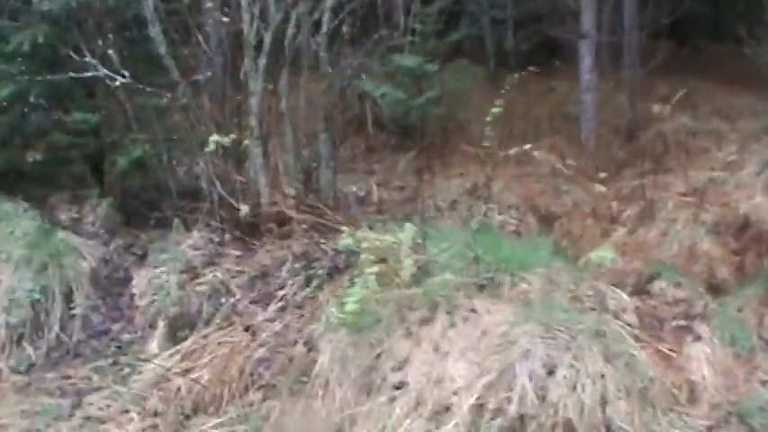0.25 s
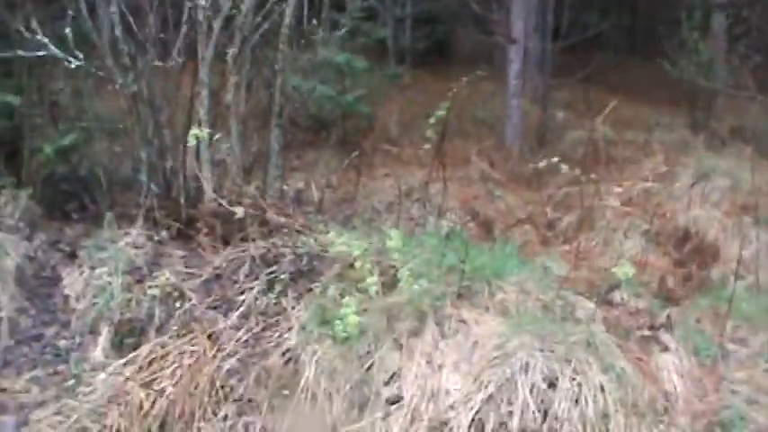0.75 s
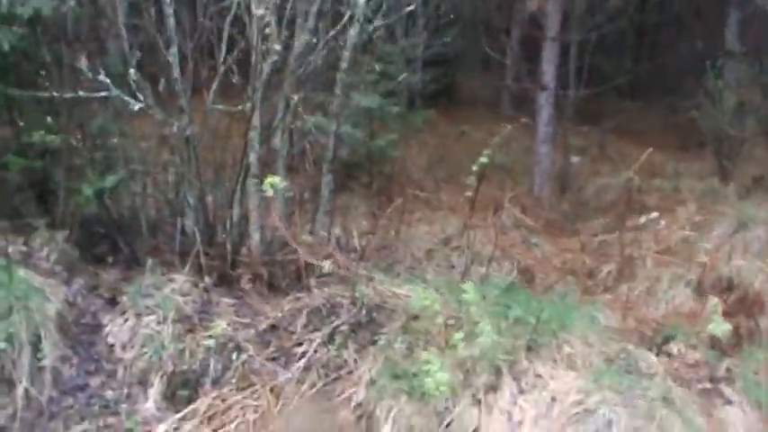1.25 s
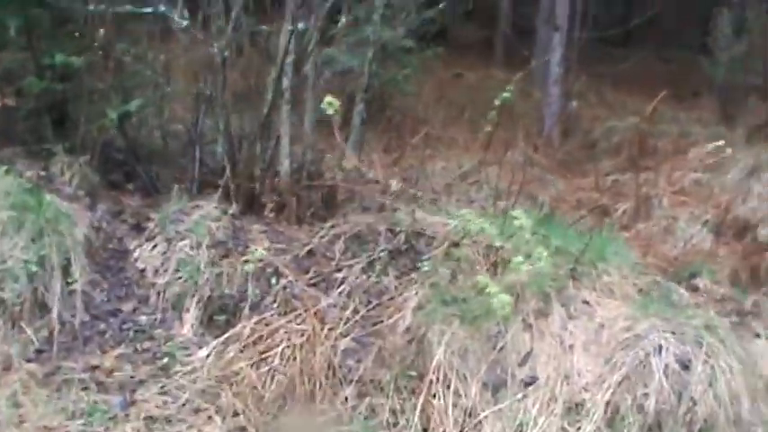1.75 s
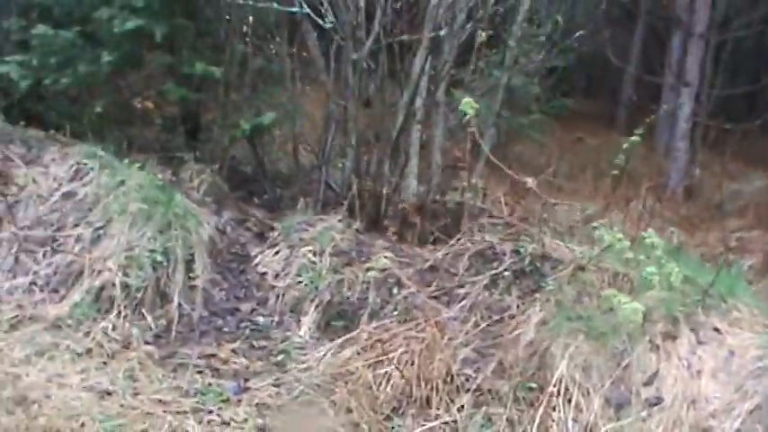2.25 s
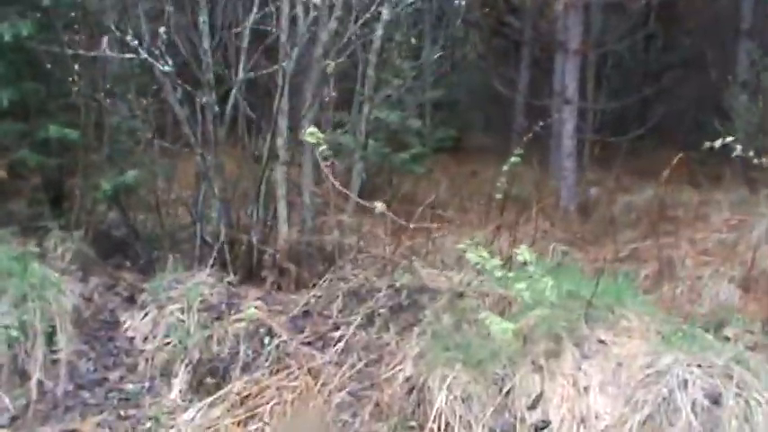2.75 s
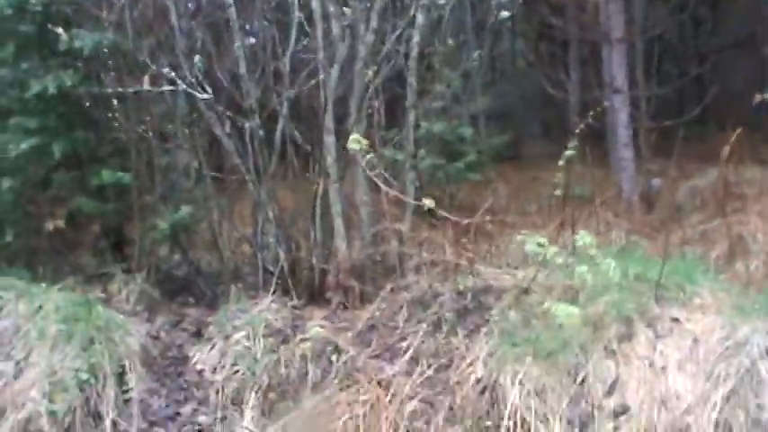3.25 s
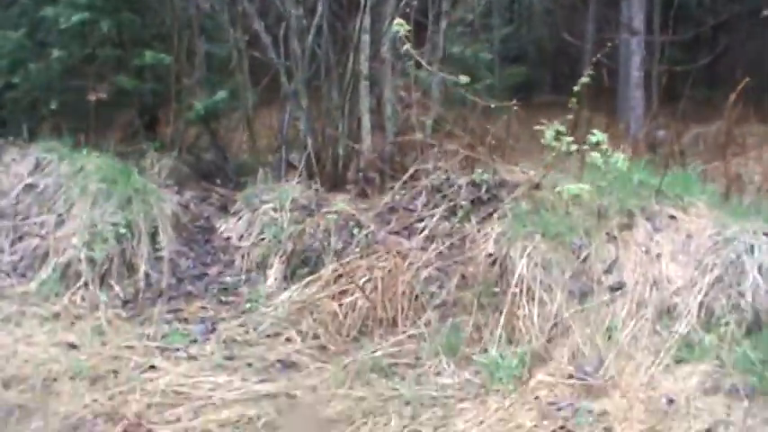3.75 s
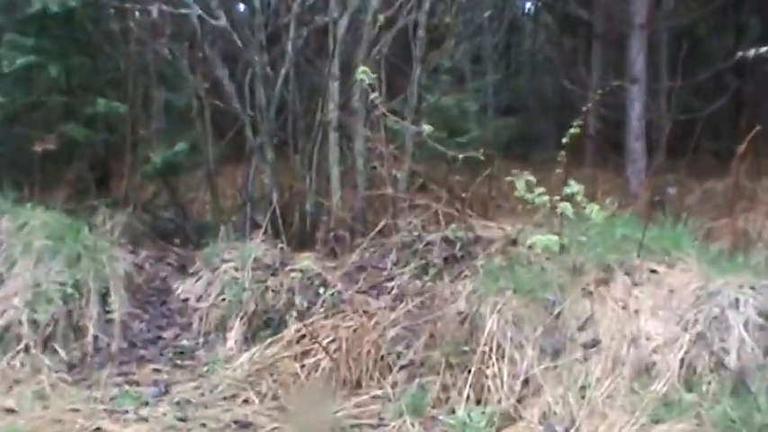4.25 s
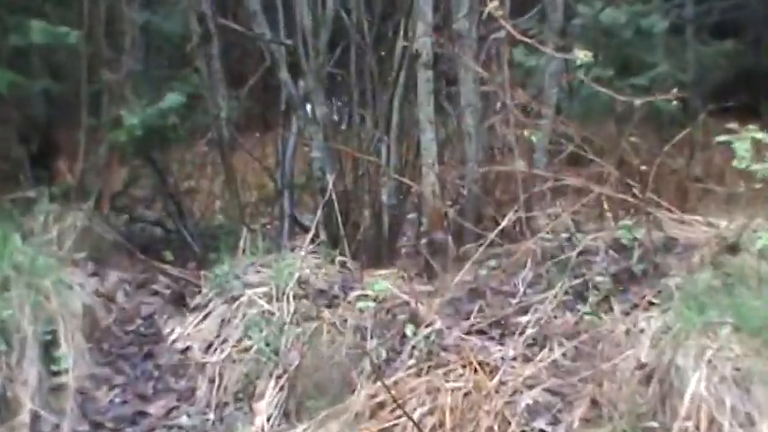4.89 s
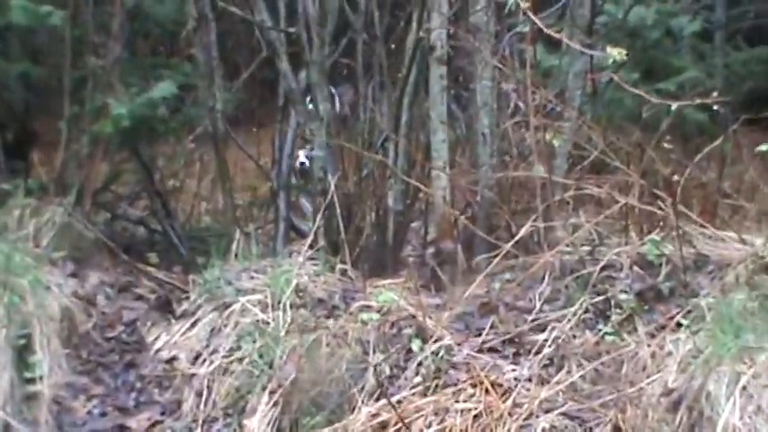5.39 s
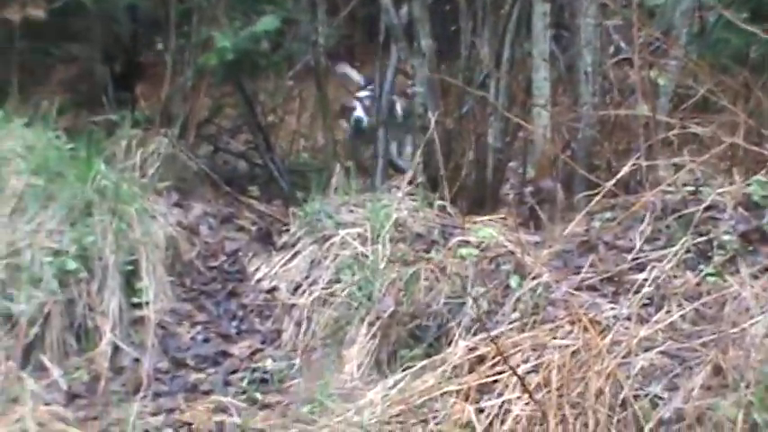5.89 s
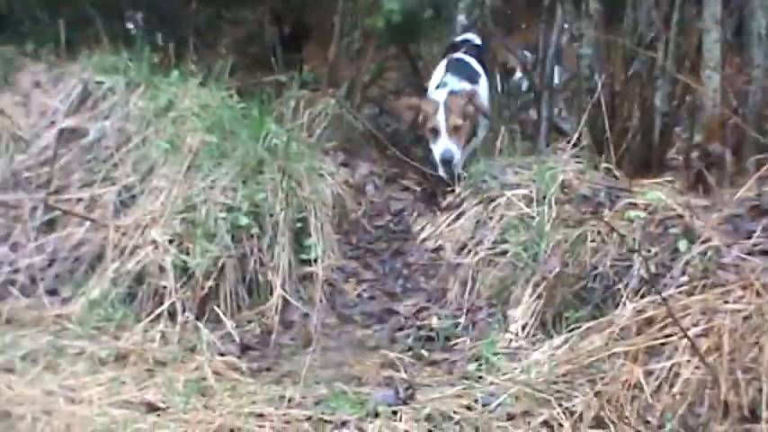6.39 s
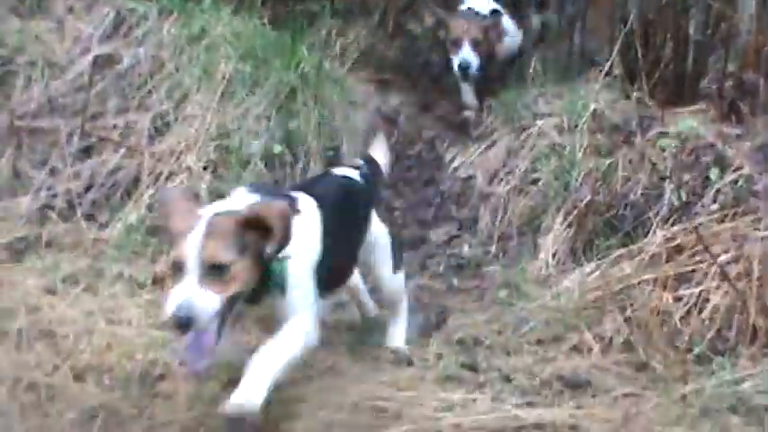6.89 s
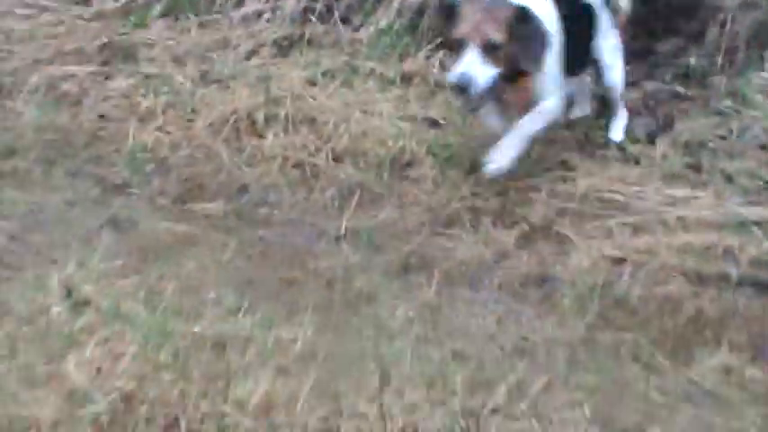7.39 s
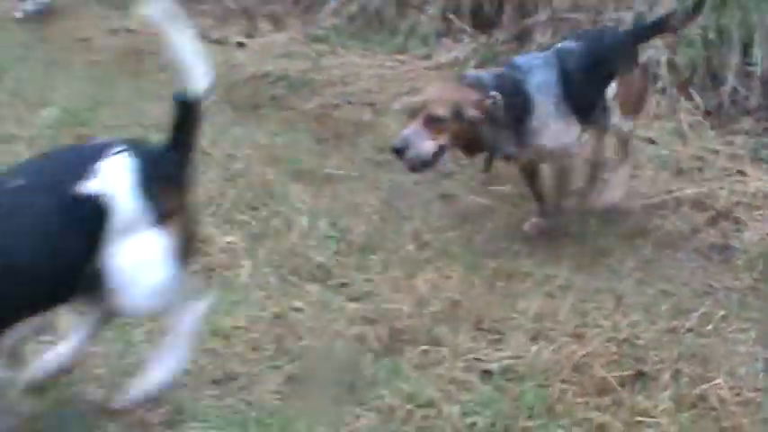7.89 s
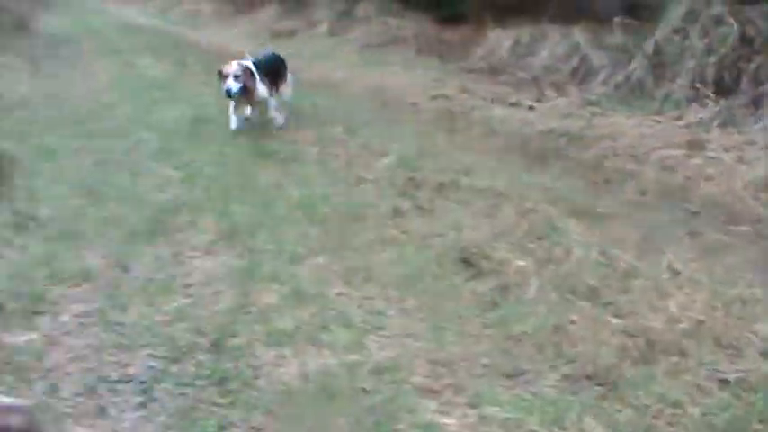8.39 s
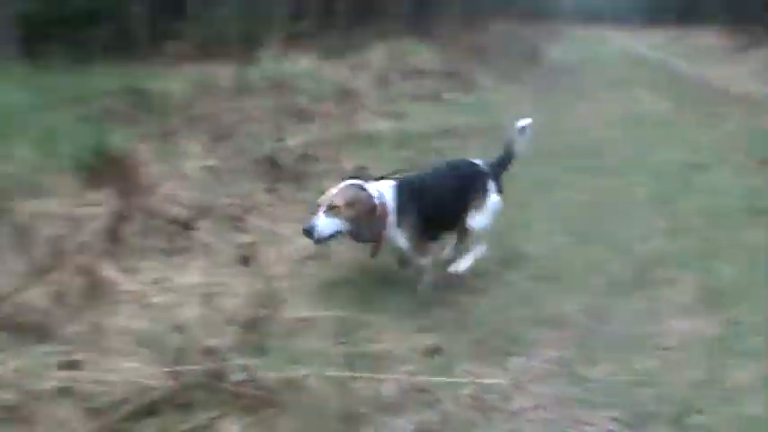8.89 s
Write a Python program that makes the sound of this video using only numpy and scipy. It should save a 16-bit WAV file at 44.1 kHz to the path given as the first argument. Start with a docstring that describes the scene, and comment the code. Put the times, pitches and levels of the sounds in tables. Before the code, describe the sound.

Baying hounds run up a woodland trail, short howls and rough barks ringing off trees, then twigs, paws, grass and panting close by.

```python
"""A clear howl and a harsh bark sound together at once, over rustling leaves and wind; the trees echo them.
A pack of hounds bays in a wood, runs up a trail and passes a hand-held camera.
Howls are sums of gliding overtones; barks are uneven pulses ringing through chest and mouth, with hiss.
Twigs snap as fading noise, noses whistle and paws thump as short tones. Later, brushed grass and pants
come close as swells of noise. Wind brushes the two microphone ports as low noise."""
import sys
import numpy as np
from scipy import signal
from scipy.fft import rfft, irfft, next_fast_len
from scipy.io import wavfile
from scipy.ndimage import uniform_filter1d, minimum_filter1d, map_coordinates

SR = 44100
rng = np.random.default_rng(int(sys.argv[2]) if len(sys.argv) > 2 else 0)


def to_wav(s):
    """Save 16-bit WAV."""
    ch = np.atleast_2d(s).T  # columns
    pcm = np.round(np.clip(ch, -1, 1) * 32767)  # PCM
    wavfile.write(sys.argv[1], SR, pcm.astype(np.int16))


N = 402985
T = np.arange(N) / SR  # the time of each sample, in seconds


def amp(db):
    """Turn a level in dB into a gain."""
    return 10 ** (np.asarray(db) / 20)


def unit(x):
    """Scale a signal to an rms of 1."""
    return x / np.sqrt(np.mean(x ** 2) + 1e-20)


def along(points, hz):
    """Read a value between (Hz, value) points, on a log frequency axis."""
    f, v = np.transpose(points)
    return np.interp(np.log(hz + 1), np.log(f + 1), v)


def curves(rows, t):
    """Read each column after the first at the times t."""
    s, *cols = np.transpose(rows)
    return [np.interp(t, s, c) for c in cols]


def wobble(rate):
    """Draw a smooth random curve with this many knots a second."""
    return map_coordinates(rng.standard_normal(int(N * rate / SR) + 4), [T * rate])


def filtered(x, response):
    """Multiply the spectrum of x by a complex response."""
    m = next_fast_len(N + 8192)
    return irfft(rfft(x, m) * response(np.fft.rfftfreq(m, 1 / SR)), m)[..., :N]


def coloured(x, spectrum):
    """Shape x with (Hz, dB) points, then scale it to an rms of 1."""
    return unit(filtered(x, lambda hz: amp(along(spectrum, hz))))


def span(s, length, rise, fall):
    """Give the samples of a call, its progress from 0 to 1 and its soft edges."""
    part = slice(round(s * SR), min(N, round((s + length) * SR)))
    t = T[part] - s
    edge = np.clip(np.minimum(t / rise, (length - t) / fall), 0, 1) ** 1.2
    return part, t / length, edge


def resonate(x, centre_hz, width_hz, lift_db, patchy_db):
    """Pass x through a moving throat resonance, with patches of chance where the throat's shape shifts."""
    hz, t, z = signal.stft(x, SR, nperseg=512)
    centre = np.interp(t, T, centre_hz)
    hump = 1 / (1 + ((hz[:, None] - centre) / width_hz * 2) ** 2)
    above = 1 / (1 + (0.54 * centre / (hz[:, None] + 1)) ** 6)  # little sounds far below the resonance
    field = rng.standard_normal(z.shape)
    field = uniform_filter1d(uniform_filter1d(field, size=4, axis=0), size=5, axis=1)
    shaped = z * above * amp(lift_db * hump + patchy_db * unit(field))
    return unit(signal.istft(shaped, SR, nperseg=512)[1][:N])


def puffs(table):
    """Make short swells of noise, each in one wide resonance."""
    out = np.zeros(N + SR)
    for s, length, hz, width_hz, db in table:
        u = np.arange(round(length * SR)) / (length * SR)
        f = np.fft.rfftfreq(len(u), 1 / SR)
        band = 1 / (1 + np.abs((f - hz) / width_hz * 2) ** 2.1)
        puff = irfft(rfft(rng.standard_normal(len(u))) * band, len(u))
        swell = np.sin(np.pi * u ** 0.73)  # loudest before the middle
        out[round(s * SR):][:len(u)] += amp(db) * swell * unit(puff)
    return out[:N]


# Throat colour of a howl's overtones: pitch_hz, level_db
THROAT_COLOUR = [(2000, -2), (3300, -12), (3800, -26.5), (4500, -19.5), (5500, -36), (7500, -27),
                 (10000, -33), (12000, -45)]
# Clear howls, two rows at once where a voice carries an undertone: start_s, length_s, turn (share of length),
# start_hz, turn_hz, end_hz, level_db (at the turn), onset_db and fade_db (how far below that it starts and ends),
# overtone_db (above the fundamental, before throat and mouth), mouth_hz, roughness (0-1)
HOWL_CALLS = [ (0.0, 0.27, .55, 955, 1202, 1197, -28.5, 9, 16.5, -3.5, 2310, 1),
              (0.615, 0.16, 0.54, 805.5, 634, 601, -24.5, 4, 8.5, -9.5, 2330, 0.27),
              (0.97, 0.15, 0.47, 510.3, 607, 582, -32.5, 15, 8, -2.5, 1800, 0.77),
              (1.326, 0.15, 0.46, 582, 603.5, 592.5, -28, 9, 23, -12, 1780, 0.74),
              (1.725, 0.055, 0.66, 942, 1116, 1071, -18.5, 13, 15, -18.5, 2178, 0.45),
              (2.19, 0.054, 0.48, 997, 1087, 1029, -26.5, -2, 4, -13, 2050, 0.62),
              (2.251, .17, 0.52, 1033, 671, 655, -21.5, 1, 22, -13, 2060, 0.53),
              (2.6, 0.13, 0.45, 641.5, 662, 658.3, -23.5, 12, 9.5, -20, 1948, .6),
              (2.87, 0.073, 0.18, 894, 908.5, 760, -21, 24, -8, -16.5, 2607, 0.39),
              (2.975, 0.11, 0.41, 650.7, 687, 677, -14.5, 5, 14, -18, 2120, 0.47),
              (3.15, 0.24, .3, 1101, 1320, 1284, -23, 7.5, 14.5, -3, 2593, 0.61),
              (3.655, 0.23, 0.61, 837, 647, 663.8, -17, 3, 19, -14.5, 2093, .3),
              (3.87, 0.047, 0.48, 992, 1007, 1103, -30, 8, -7, -10, 2087, 0.42),
              (3.915, 0.16, .3, 1148, 1262, 1292, -19.5, 2.5, 10.5, 0.5, 2570, 0.35),
              (4.385, 0.26, 0.56, 893, 644, 748, -21.5, 3, 3.5, -10.5, 2470, 0.39),
              (4.632, 0.17, 0.74, 1126, 1245, 1035, -27.5, -3.5, 1, -9, 2460, 0.5),
              (4.989, 0.039, 0.86, 945, 1155, 1203, -12, 4, 10, -8.5, 2208, 0.62),
              (5.128, .11, .4, 690.2, 640.5, 618, -21, -1, 6.5, -16.5, 1602, 0.37),
              (5.312, 0.049, 0.69, 903, 1104, 1160, -23, 2, 14, -32, 2100, .6),
              (5.56, .185, 0.36, 749, 644, 770, -15, 7, 4, -14, 2054, 0.29),
              (5.74, 0.19, 0.22, 1147, 1203, 786.3, -18, 0.5, 1.5, -14.5, 2357, 0.45),
              (6.101, 0.05, 0.51, 697, 707, 686.6, -22.5, 12, 4, -9.5, 1400, 0.47),
              (6.149, .12, 0.46, 649, 617, 563, -19.5, 4.5, 7.5, -8, 1250, 0.61),
              (6.258, 0.099, 0.52, 1010, 1059, 813, -32.5, -2, -5, -7.5, 2107, 0.63),
              (6.589, 0.1052, 0.502, 1226, 1316, 1305, -13.5, 14.5, 23, -4.5, 2620, 0.27),
              (6.656, 0.073, 0.23, 646.5, 650.5, 702, -26.5, 6, 0.5, 0, 2157, .8),
              (6.724, 0.055, .4, 750, 791, 728.3, -18.5, 10, -10, -7.5, 2264, 0.48),
              (6.79, 0.12, 0.22, 711, 692, 564.3, -11.5, 3, 10, -13.5, 1940, 0.45),
              (6.929, 0.087, 0.11, 1044, 1010, 813, -26, -4, 5.5, -8, 2060, 0.65),
              (7.219, 0.023, 0.24, 400.7, 431.4, 520, -21.5, 8, -4, -33, 1800, 0.43),
              (7.238, 0.039, 0.49, 741, 797, 770, -25, 0, 27, 8.5, 2335, 0.32),
              (7.483, 0.07, 0.47, 822, 777, 742, -8.5, 6, 3, -11.5, 3650, 0.73),
              (7.548, 0.034, .3, 686, 704, 735, -14, 0, -5, -14, 2100, 0.28),
              (7.547, 0.039, .3, 1382, 1414, 1424, -5, -1, 6, 4.5, 3844, 0.51),
              (7.955, 0.052, 0.64, 872, 1134, 1006, -21, 1, 24, -19.5, 1900, 0.55),
              (8.129, 0.068, 0.083, 835, 844.4, 759, -13, 22, -2, -12.5, 2330, 0.27),
              (8.193, .03, 0.38, 1123, 1142, 800, -10, 8, 8, -9.5, 2280, 0.86),
              (8.31, 0.094, 0.27, 523, 508.5, 582, -30, 6, -1, -23, 1042, 0.68),
              (8.509, 0.069, .45, 812, 890, 786, 0, 10, 15, -19.5, 2720, 0.11),
              (8.585, 0.13, 0.31, 782, 679, 556, -18, -11, 5.5, -15, 1470, 0.4),
              (8.7, .1, 0.301, 1106, 1018, 895, -29.5, -5, 5, -15, 2000, .9),
              (8.947, 0.17, .1, 591, 588.5, 590, -22.5, 15, 9, -11.5, 1189, 0.97)]
HOWL_RISE_S, HOWL_FALL_S = 0.0045, 0.0087
LIPS_WIDTH_HZ, LIPS_DB = 900, 9.5  # the mouth lifts the overtones near its resonance
OVERTONE_FADE = 0.75  # overtones follow this share of the fundamental's swell and fade, in dB
# Overtones lose this many dB per kHz for each dB of echo above that of a near hound
FAR_LOSS_PER_KHZ, NEAR_ECHO_DB = 0.026, -17
BREAK_DB = 1.5  # extra flicker from the third harmonic up, even in a smooth howl
SWELL_CAP = 1.3  # a harmonic dips freely but swells little


def howls(count, jitter, shimmer_db):
    """Regular vocal folds: harmonics on one pitch that glides, turns and glides on; throat and mouth shape them."""
    out, shake = np.zeros(N), wobble(90)
    flutter = [wobble(rate) for rate in (50, 50, 50, 30, 30)]
    for (s, length, turn, start_hz, turn_hz, end_hz, db, onset_db, fade_db,
         over_db, mouth_hz, rough) in HOWL_CALLS:
        part, u, edge = span(s, length, HOWL_RISE_S, HOWL_FALL_S)
        knots = [0, np.clip(turn, .02, .98), 1]
        away = np.interp(u, knots, [1, 0, 1]) ** 2  # the glide is slowest at the turn
        hz = turn_hz + away * (np.where(u < knots[1], start_hz, end_hz) - turn_hz)
        swell_db = np.interp(u, knots, [-onset_db, 0, -fade_db])
        phase = 2 * np.pi * np.cumsum(hz * (1 + rough * jitter * shake[part])) / SR
        k = np.arange(1, count + 1)[:, None]  # harmonic numbers; 1 is the fundamental
        k = k[k[:, 0] * turn_hz < THROAT_COLOUR[-1][0]]
        lips_db = LIPS_DB / (1 + ((k * hz - mouth_hz) / LIPS_WIDTH_HZ * 2) ** 2)
        loss = FAR_LOSS_PER_KHZ * max(curves(TRAIL_PATH, s)[1] - NEAR_ECHO_DB, 0)
        colour_db = over_db + along(THROAT_COLOUR, k * hz) + lips_db - loss * k * hz / 1000
        shape_db = (k > 1) * (colour_db + (OVERTONE_FADE - 1) * swell_db)
        # higher harmonics waver more
        waver = np.sqrt(k) * np.array([f[part] for f in flutter])[k[:, 0] % len(flutter)]
        waver_db = (rough * shimmer_db + BREAK_DB * (k > 2)) * np.minimum(waver, SWELL_CAP)
        harmonics = amp(shape_db + waver_db) * np.sin(k * phase + k * k)
        out[part] += np.sqrt(2) * edge * amp(db + swell_db) * np.sum(harmonics, axis=0)
    return out


# Colours of a bark's chest, mouth and hiss, each scaled to rms 1 after use: pitch_hz, level_db (per Hz, relative)
CHEST_COLOUR = [(200, -58), (380, -28), (480, -2.5), (600, 0.5), (850, 0), (1200, -7.5), (1500, -26),
                (1950, -6), (3300, -120)]
MOUTH_COLOUR = [(710, -27), (1200, 10), (1320, 7.5), (1710, 5.5), (2170, 0.5), (2560, 5), (3530, -15.5),
                (3800, -31), (4940, -49), (8360, -120)]
HISS_COLOUR = [(2060, -54), (3500, -11), (4250, 2), (5120, -5), (5980, 2), (6480, -9), (7340, -1),
               (8530, -4), (9420, -3.5), (10800, -7.5), (15500, -47)]
# Harsh barks: start_s, length_s, peak (share of length), chest_db (at the peak), onset_db (below that),
# mouth_db and hiss_db (above the chest, at the peak), start_rate_hz and end_rate_hz (pulses, before the scoop
# and drift), mouth_hz (halfway through the sink), disorder (0-1)
BARK_CALLS = [ (0.0, 0.092, 0.38, -32, 7, -1.5, -41, 735, 737, 2010, 1),
              (0.307, 0.14, 0.55, -28.5, 1, -5.5, -26, 1172, 997, 1930, 1),
              (0.621, .08, 0.49, -32, 14, 5.5, -12, 723.5, 643, 2130, 1),
              (0.958, 0.17, 0.45, -25, 2.5, -2, -23.5, 1134, 1192, 1838, .6),
              (1.3, .17, 0.55, -30, 6, 2.5, -23, 673, 684, 2020, 1),
              (1.724, 0.22, 0.57, -24, 8.5, -8, -21, 921, 763, 1920, .7),
              (1.971, .19, 0.32, -22, 14, -0.5, -21.5, 869, 933, 1760, 1),
              (2.194, 0.23, 0.51, -22.5, 2.5, -5.5, -20.5, 1047, 658, 1870, .8),
              (2.578, .17, .2, -30.5, 12, 4.5, -20, 700.7, 674.3, 2028, 1),
              (2.9, 0.24, 0.26, -15, 13.5, -3.5, -23, 830.4, 700.7, 2149, 1),
              (3.204, 0.13, 0.86, -34.5, 30, 13.5, -14, 1221, 929, 2600, 1),
              (3.444, .216, .35, -17.5, 14, -6.5, -25.5, 828.4, 841, 1833, 1),
              (3.895, 0.21, 0.76, -22, 2, -5.5, -29.5, 1173, 1134, 2284, 1),
              (4.374, 0.17, 0.53, -20, 10.5, 5, -29, 979, 695, 1906, .9),
              (4.986, 0.25, 0.2, -15.5, 1.5, 5, -15.5, 1106, 662.4, 1733, .8),
              (5.309, 0.32, 0.57, -13.5, 9.5, -0.5, -20, 1040, 1096, 1530, .8),
              (5.848, .19, 0.75, -14, 7.5, -2.5, -14.5, 979.4, 800.4, 1870, 1),
              (6.128, 0.078, 0.7, -36.5, 5, 13.5, -7, 763, 832, 1800, 1),
              (6.65, 0.069, 0.91, -29.5, 6.5, 11, -7, 880.4, 798, 2290, 1),
              (6.754, 0.2, .15, -21, 5, 6, -14, 718.6, 730, 1810, .8),
              (7.217, 0.077, 0.11, -16.5, 6, 11, -24, 688.5, 765, 2258, .8),
              (7.575, .065, 0.56, -16.5, -1, 2, -26, 748, 704, 2400, .9),
              (8.276, 0.1918, 0.79, -14.5, 5.5, -21.5, -39.5, 775.3, 804.4, 1811, .8),
              (8.568, 0.22, 0.34, -16, -2, -1, -54, 792, 559.3, 1655, .6),
              (8.922, 0.22, .15, -14.5, 13, -0.5, -32, 853, 864, 1916, .8)]
BARK_END_DB, BARK_SAG_DB_PER_S = -9.5, -7  # below the peak; longer tails end lower
BARK_RISE_S, BARK_FALL_S = 0.012, 0.026
CLOSING_DB, HISS_SINK_DB = -5.5, -8  # over a bark the jaws close on the mouth band, and the hiss weakens
MOUTH_SINK = 0.044  # the mouth resonance sinks from this share above its middle to as far below
# A bark opens low and nearly voiced, then breaks up: share of the pulse rate below, share of the disorder
SCOOP_S, SCOOP, SCOOP_DISORDER = .03, .14, .45


def bark_pulses(rate, disorder, drift, scatter, size_db, alternate_db):
    """Chaotic vocal folds let out pulses at uneven gaps and sizes."""
    cycles = np.arange(1, 12000)
    chaos = disorder * (.25 + np.minimum(np.abs(wobble(25)), 1.2))  # the folds fall in and out of step
    turns = np.cumsum(rate * np.exp(drift * wobble(45))) / SR
    at = np.interp(cycles, turns, np.arange(N)).astype(int)
    moved = at + scatter * chaos[at] * SR / rate[at] * rng.standard_normal(len(at))
    uneven_db = size_db * chaos[at] * rng.standard_normal(len(at))
    every_other_db = alternate_db * wobble(20)[at] * (-1.) ** cycles
    sizes = amp(uneven_db + every_other_db) * (at < N - 1)
    return np.bincount(np.clip(moved, 0, N - 1).astype(int), sizes, N)


def barks(drift, scatter, size_db, alternate_db):
    """Uneven pulses from the folds ring chest and mouth; the air hisses with each pulse."""
    ends = []
    for s, length, *_, start_rate, end_rate, hz, loose in BARK_CALLS:
        high_hz, low_hz = hz * (1 + MOUTH_SINK), hz * (1 - MOUTH_SINK)
        ends.append((s, start_rate * (1 - SCOOP), high_hz, loose * SCOOP_DISORDER))
        ends.append((s + SCOOP_S, start_rate, high_hz, loose))
        ends.append((s + length, end_rate, low_hz, loose))
    rate, mouth_hz, disorder = curves(ends, T)
    pulses = bark_pulses(rate, disorder, drift, scatter, size_db, alternate_db)
    # low tones leave the throat last
    ringing = filtered(pulses, lambda hz: np.exp(-1j * 9 * np.log(1 + hz / 500)))
    chest = resonate(coloured(ringing, CHEST_COLOUR), rate, width_hz=1900, lift_db=13.5, patchy_db=5)
    mouth = resonate(coloured(ringing, MOUTH_COLOUR), mouth_hz, width_hz=1700, lift_db=4.5, patchy_db=5.5)
    gate = 1.7 + unit(uniform_filter1d(pulses, size=24))
    hiss = coloured(gate * rng.standard_normal(N), HISS_COLOUR)
    hiss = hiss * amp(2.04 * wobble(70) + 1.9 * wobble(18))
    out = np.zeros(N)
    for s, length, peak, db, onset_db, open_db, hiss_db, *_ in BARK_CALLS:
        part, u, edge = span(s, length, BARK_RISE_S, BARK_FALL_S)
        peak = np.clip(peak, .02, .98)
        end_db = BARK_END_DB + BARK_SAG_DB_PER_S * length * (1 - peak)
        chest_db = db + np.interp(u, [0, peak, 1], [-onset_db, 0, end_db])
        mouth_gain = amp(open_db + CLOSING_DB * (u - peak))
        hiss_gain = amp(hiss_db + HISS_SINK_DB * (u - peak))
        voice = chest[part] + mouth_gain * mouth[part] + hiss_gain * hiss[part]
        out[part] += edge * amp(chest_db) * voice
    return out


# How long the wood rings at each pitch: pitch_hz, fade_s (time to fall by 60 dB)
WOOD_FADE = [(400, 0.68), (1300, 0.74), (2600, 0.85), (6000, 0.17), (12000, 0.27)]


def wood(x):
    """Trunks scatter the voices; each frequency dies at its own speed, much alike at both ports."""
    hz, t, z = signal.stft(rng.standard_normal((3, SR + SR // 2)), SR, nperseg=256)
    fade_s = np.clip(along(WOOD_FADE, hz), .05, 3)[:, None]
    fading = (z[2] + 1.15 * z[:2]) * amp(-60 * t / fade_s)  # a shared part plus one for each port
    tail = signal.istft(fading, SR, nperseg=256)[1]
    late = np.pad(x, (500, 0))[None]  # the echo starts 500 samples later
    return signal.fftconvolve(late, tail / np.linalg.norm(tail[0]), axes=1)[:, :N]


# Colour of the rustle, scaled to rms 1 after use: pitch_hz, level_db (per Hz, relative)
LEAF_COLOUR = [(40, -11), (110, 4), (350, 2), (700, 5), (1600, 5), (2900, -3.5), (6000, -9.5), (11000, -14),
               (15800, -27.5)]
# Loudness of the rustle: time_s, level_db
RUSTLE_LEVEL = [(0, -40.5), (.9, -44.5), (2.3, -42.5), (3.5, -38.5), (4.3, -40.5), (5.2, -38), (6.5, -40.5),
                (7.05, -37.5), (7.4, -39.5), (7.9, -39), (9.14, -37)]


def leaves():
    """Leaves and dry grass rustle in fine grains of noise, partly shared by both ports."""
    level_db, = curves(RUSTLE_LEVEL, T)
    grain = amp(1.5 * wobble(15) + 2.5 * wobble(300))
    noise = rng.standard_normal((3, N)) * grain
    return amp(level_db) * coloured(0.89 * noise[:2] + noise[2], LEAF_COLOUR)


# Colour of the wind, scaled to rms 1 after use: pitch_hz, level_db (per Hz, relative)
WIND_COLOUR = [(12, -40), (20, -11), (59, -5), (136, -7), (319, -22), (400, -22.5), (520, -50), (880, -120)]
# Loudness of the wind on the ports, before its lumps: time_s, level_db
WIND_LEVEL = [(0.0, -59), (0.28, -41), (0.35, -62), (0.96, -49), (1.91, -64), (2.11, -36), (2.21, -53),
              (2.36, -27), (2.7, -42), (3.13, -59.5), (3.33, -39.5), (3.53, -59), (6.49, -63.5),
              (6.82, -48), (7.05, -54), (7.33, -41), (7.86, -62), (8.37, -49), (8.5, -50), (9.14, -62)]


def wind():
    """Wind buffets the ports as lumpy low noise, partly shared and partly each port's own."""
    level_db, = curves(WIND_LEVEL, T)
    lumps = amp(2.5 * wobble(12) + 2.5 * np.array([wobble(16), wobble(16)]))
    noise = rng.standard_normal((3, N))
    return amp(level_db) * unit(lumps * coloured(noise[:2] + 1.2 * noise[2], WIND_COLOUR))


# Twig snaps, levels before the band filters: start_s, crack_db, body_db (above the crack)
TWIG_SNAPS = [(0.7906, -32.5, 14.5), (0.9311, -50, -12), (3.1612, -29, -7), (3.78, -33, 19),
              (4.9512, -25, 20.5), (6.3918, -20, 2), (6.4396, -30, -3), (6.5519, -33, 0),
              (6.6264, -21.5, -25), (6.821, -19.5, -6), (6.907, -20.5, -9), (7.083, -31, 0),
              (7.215, -23.5, 11), (7.7918, -23, -19), (7.816, -40, 2), (7.9464, -30, -6), (7.987, -34, 14),
              (8.0295, -31, 8), (8.335, -37, 15), (8.4278, -33, -2), (8.746, -29.5, -2), (9.0559, -38, 8)]


def twigs():
    """Each snap is a bright crack of noise over a duller one, both fading fast."""
    bright, dull, t = np.zeros(N + SR), np.zeros(N + SR), T[:800]
    for s, db, body_db in TWIG_SNAPS:
        here = slice(round(s * SR), round(s * SR) + len(t))
        # falls by 60 dB take 26 ms and 8.8 ms
        bright[here] += amp(db - 60 * t / 0.026) * rng.standard_normal(len(t))
        dull[here] += amp(db + body_db - 60 * t / 0.0088) * rng.standard_normal(len(t))
    high = signal.butter(2, [3500, 11500], "bandpass", fs=SR, output="sos")
    low = signal.butter(2, [600, 3500], "bandpass", fs=SR, output="sos")
    return (signal.sosfilt(high, bright) + signal.sosfilt(low, dull))[:N]


# Nose whistles, pitches before the shake: start_s, length_s, start_hz, end_hz, level_db
NOSE_WHISTLES = [(7.469, 0.019, 6040, 7410, -28), (7.624, 0.024, 4730, 4730, -16),
                 (7.817, 0.053, 6260, 6100, -32.5), (8.116, 0.023, 6000, 8500, -23),
                 (8.188, 0.036, 7170, 6220, -20.5), (8.217, 0.024, 4940, 4660, -14.5),
                 (8.428, 0.024, 10800, 10530, -38), (8.496, 0.0197, 8400, 7800, -39.5),
                 (8.735, 0.031, 4830, 4823, -40), (5.382, 0.027, 5950, 5980, -27.5),
                 (0.928, 0.019, 8500, 8450, -33)]


def whistles():
    """Air forced through the nose makes brief, unsteady high tones."""
    out, shake = np.zeros(N), wobble(430)
    for s, length, start_hz, end_hz, db in NOSE_WHISTLES:
        part = slice(round(s * SR), round((s + length) * SR))
        u = (T[part] - s) / length
        hz = (start_hz + (end_hz - start_hz) * u) * (1 + 0.036 * shake[part])
        out[part] += amp(db) * np.sin(np.pi * u) * np.sin(2 * np.pi * np.cumsum(hz) / SR)
    return out


# Paw thumps: time_s (12 ms after the thump starts), level_db, pitch_hz (passed on the way down)
PAW_THUMPS = [(3.759, -39, 134.7), (4.289, -41, 194), (4.617, -55, 154.5), (4.728, -40, 207.4),
              (5.182, -39, 124.9), (5.629, -37.5, 164), (5.776, -35.5, 183.8), (6.025, -37, 209.4),
              (6.737, -26.5, 171.2), (7.138, -62, 205.7), (7.228, -37, 297), (7.283, -32.5, 304),
              (7.336, -28, 147), (7.435, -43, 174), (7.628, -40, 171.4), (8.013, -30.5, 238),
              (8.064, -25.5, 158.6), (8.23, -20.5, 178), (8.359, -38, 121.6)]
SINK_FROM = 1.308  # a thump starts at this many times its table pitch


def paws():
    """Soft ground yields under a paw: a short low note that sinks, with a weak overtone."""
    out, t = np.zeros(N + SR), T[:SR // 8]
    swell = np.sin(np.pi * np.clip(t / 0.055, 0, 1))  # over after 55 ms
    for s, db, hz in PAW_THUMPS:
        phase = 2 * np.pi * np.cumsum(SINK_FROM * hz * np.exp(-t / 0.0816)) / SR
        note = np.sin(phase) + amp(-6.5) * np.sin(2 * phase)
        out[round((s - .012) * SR):][:len(t)] += amp(db) * swell * note
    return out[:N]


# Hounds brushing through dry grass close by, before the crackle: start_s, length_s, centre_hz, width_hz, level_db
GRASS_BRUSHES = [(6.6, 0.28, 8850, 9000, -41), (6.96, 0.11, 10000, 9000, -35), (7.08, .1, 10200, 9000, -42),
                 (7.24, 0.22, 10760, 10000, -36), (7.45, 0.061, 9907, 9000, -42),
                 (7.52, 0.27, 8500, 8000, -39.5), (7.76, 0.2, 8000, 9000, -45),
                 (7.98, 0.15, 10980, 8970, -47), (8.2, 0.095, 9750, 7950, -36.5),
                 (9.03, 0.12, 10000, 9000, -44)]
CRACKLE_DB = 3.5  # strength of each of two random curves


def brushing():
    """Dry grass hisses in swells of noise; its stalks break them up into crackle."""
    crackle = unit(amp(CRACKLE_DB * (wobble(60) + wobble(500))))
    return puffs(GRASS_BRUSHES) * crackle


# Pants: start_s, length_s, centre_hz, width_hz, level_db
MOUTH_PANTS = [(6.97, 0.097, 3120, 1600, -24.5), (7.13, 0.16, 2455, 2012, -37.5),
               (7.272, 0.14, 2370, 5050, -31.5), (7.628, 0.086, 2280, 2500, -31.5),
               (7.801, 0.14, 2010, 2530, -34), (8.108, 0.12, 2990, 5000, -33.5),
               (8.213, 0.09, 4550, 2450, -27.5), (8.206, 0.065, 1460, 2480, -24)]


def pants():
    """Air rushing through the open mouth is a short swell of noise."""
    return puffs(MOUTH_PANTS)


# The pack's place along the trail: time_s, pan_db (left minus right), echo_db (of the wood)
TRAIL_PATH = [(0.0, -0.5, -1), (1.22, 2.5, -10), (2.19, -0.5, -10.5), (3.74, 0, -10), (4.02, 0, -11),
              (6.29, -1, -17.5), (6.44, 1.5, 0), (7.03, -2.5, -36), (7.73, -2.5, -28), (7.86, 1.5, -16),
              (8.55, 11, -21.5), (9.14, 8, -30)]
# Phase between the ports: pitch_hz, left_lead_rad (below zero, the right leads)
PORT_LEAD = [(200, -0.64), (400, -1.1), (800, -0.65), (1100, -0.46), (2700, -0.34), (6000, 0.48)]
# The camera body shades the ports: pitch_hz, shade_db (left minus right)
PORT_SHADE = [(200, 1), (550, -4), (1200, -2), (2500, -2.5), (5000, 0.5)]


def scene():
    """The pack and the wood's echo reach two close ports, a little apart in phase, tone and level."""
    pan_db, echo_db = curves(TRAIL_PATH, T)
    voices = howls(count=16, jitter=.016, shimmer_db=4)
    voices = voices + barks(drift=.06, scatter=.2, size_db=3, alternate_db=4.5)
    pack = voices + twigs() + whistles() + brushing() + pants()
    arriving = pack + paws() + wood(amp(echo_db) * pack)
    sides = np.array([[.5], [-.5]])  # left and right take half of each difference

    def ports(hz):
        return np.exp(1j * sides * along(PORT_LEAD, hz)) * amp(sides * along(PORT_SHADE, hz))

    return filtered(arriving, ports) * amp(sides * pan_db) + leaves() + wind()


TOP_HZ = 15900


def record(dry):
    """A fast limiter holds the loudest cries, and the camera keeps nothing above its band limit."""
    need = np.minimum(1, 0.67 / (np.abs(dry).max(0) + 1e-9))
    gain = uniform_filter1d(minimum_filter1d(need, size=160), size=160)
    return filtered(dry * gain, lambda hz: hz < TOP_HZ)


dry = scene()
out = record(dry)
to_wav(out)
```